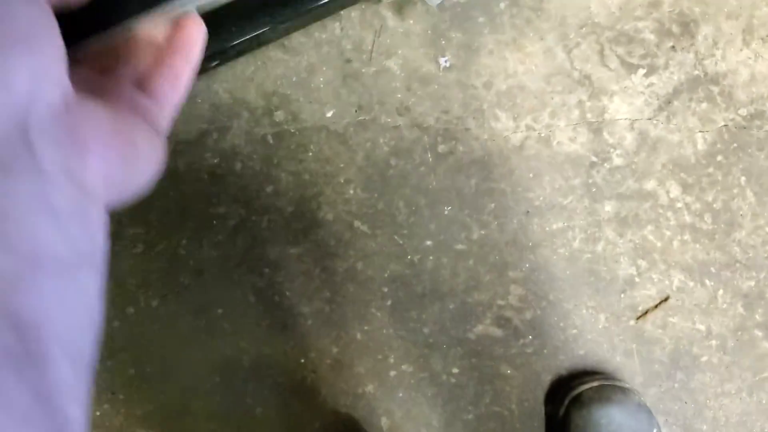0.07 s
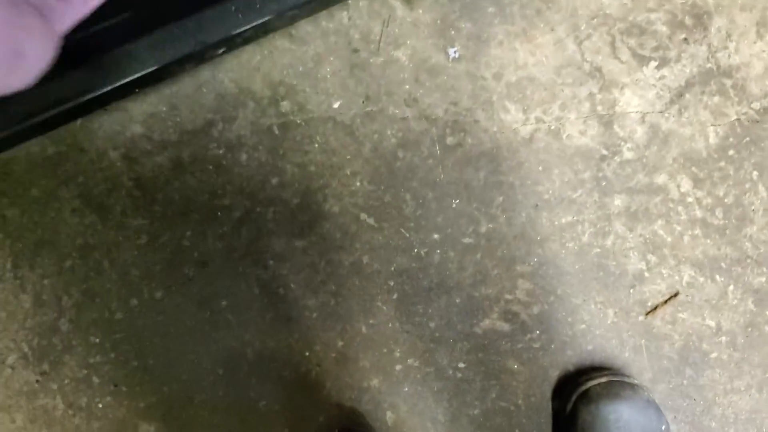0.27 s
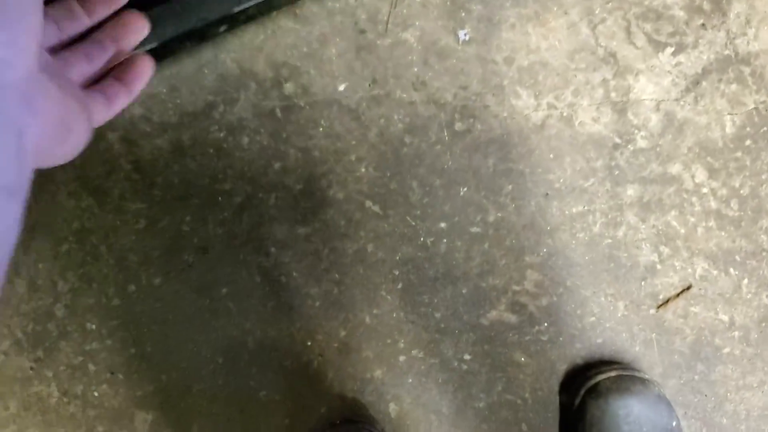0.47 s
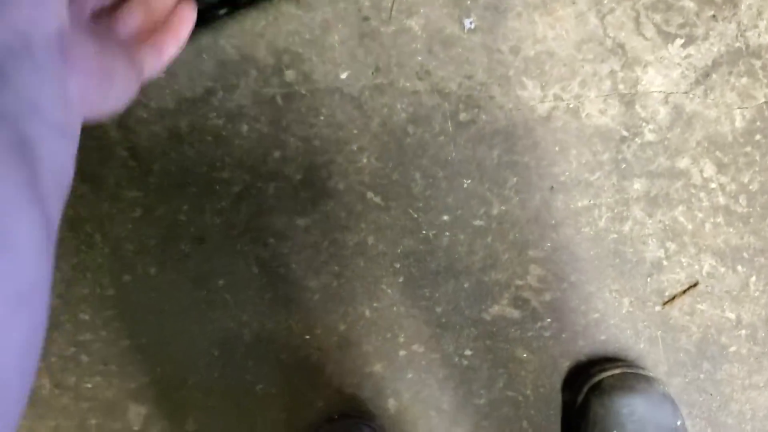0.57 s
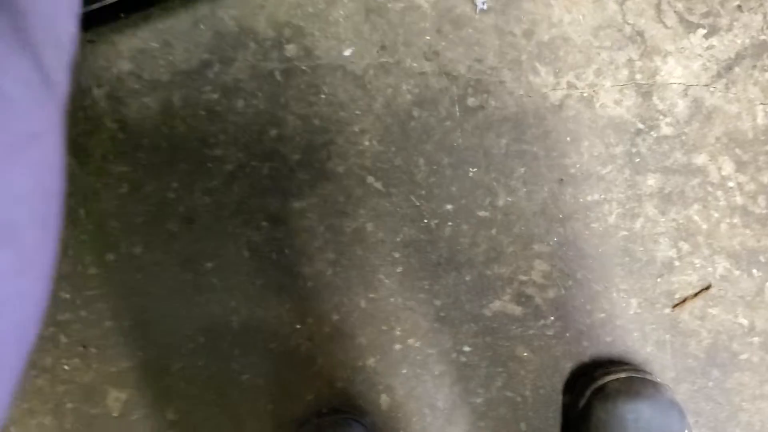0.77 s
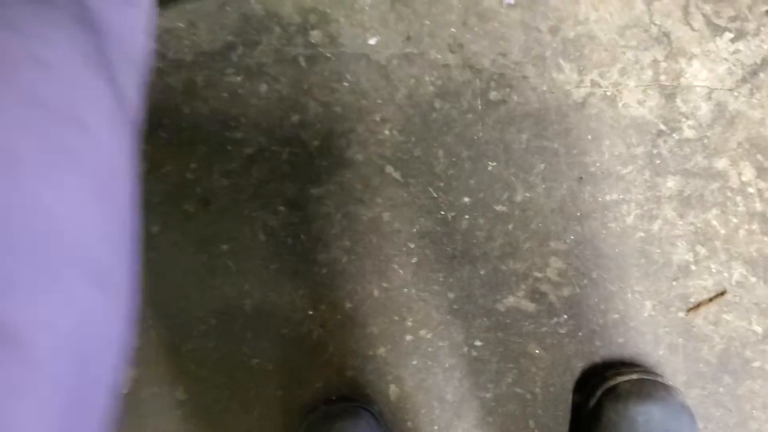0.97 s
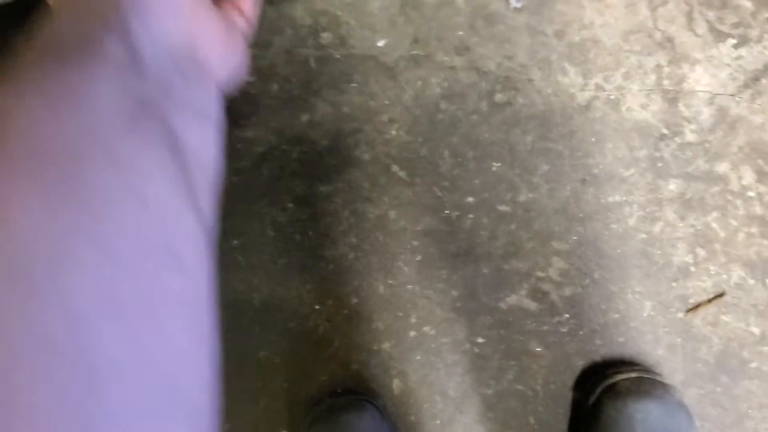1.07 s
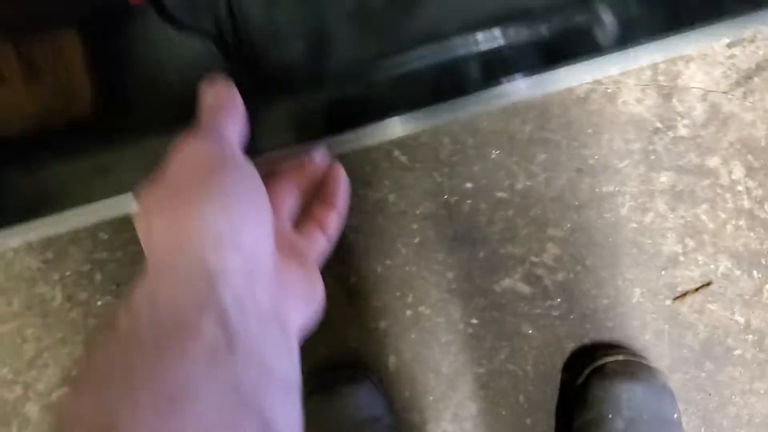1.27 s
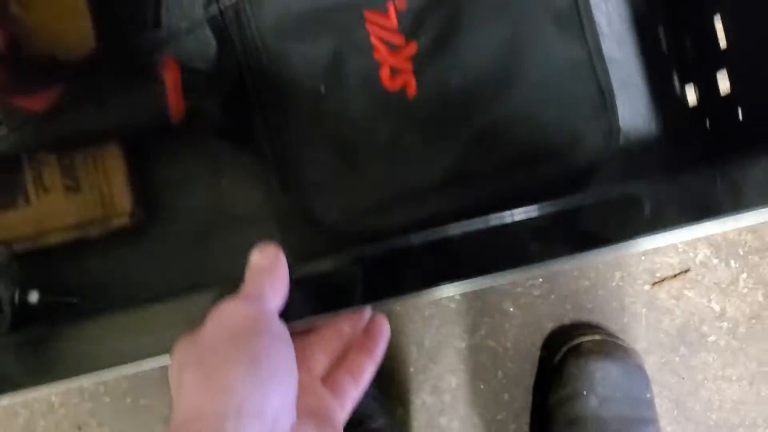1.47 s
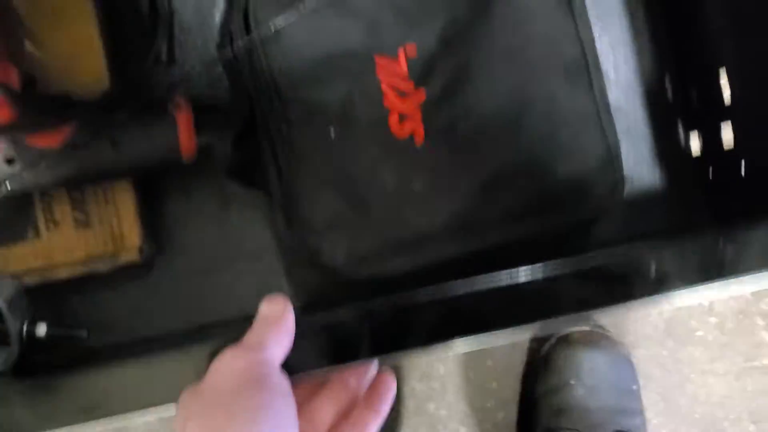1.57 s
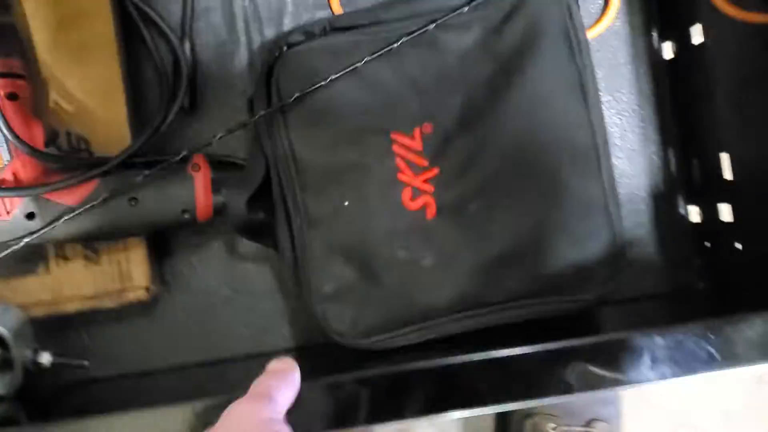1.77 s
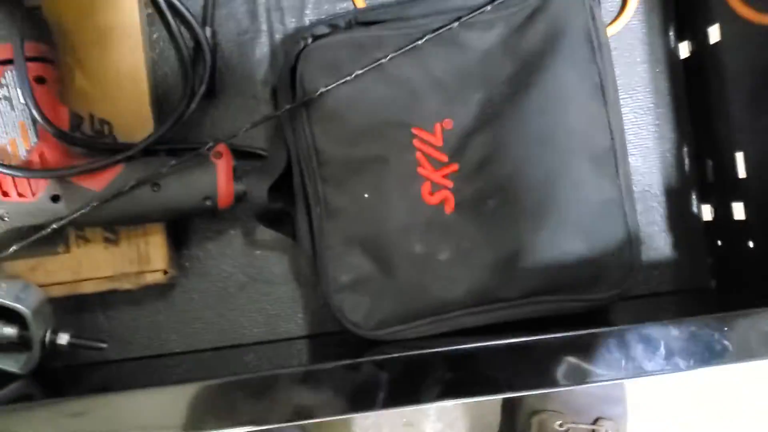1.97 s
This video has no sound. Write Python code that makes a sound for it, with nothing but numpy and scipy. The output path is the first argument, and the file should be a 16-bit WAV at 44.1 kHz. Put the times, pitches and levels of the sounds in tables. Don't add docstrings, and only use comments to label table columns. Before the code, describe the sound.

A heavy steel tool drawer clicks and bangs shut with a deep boom, then after light handling a second drawer rolls open, clacks midway and slams to its stop, heard close in a reverberant garage.

```python
import sys
import numpy as np
from scipy import signal
from scipy.fft import rfft, irfft, next_fast_len
from scipy.io import wavfile
from scipy.ndimage import uniform_filter1d

SR = 44100
rng = np.random.default_rng(int(sys.argv[2]) if len(sys.argv) > 2 else 0)


def int16_out(signal):
    q = np.round(np.clip(np.atleast_2d(signal).T, -1, 1) * 32767)
    wavfile.write(sys.argv[1], SR, q.astype(np.int16))


def elevation(decibels):
    levels = np.asarray(decibels, float)
    return 10 ** (levels / 20)


N = 89214

APART_HZ = 1000


def rms_one(x):
    return x / np.sqrt(np.mean(x ** 2) + 1e-20)


def in_time(rows):
    s, db = np.transpose(rows)
    return np.interp(np.arange(N) / SR, s, db, left=-120)


def shaped(x, gain_db):
    size = next_fast_len(2 * x.shape[-1])
    size += size % 2
    hz = np.maximum(np.arange(size // 2 + 1) * SR / size, 10)
    cepstrum = irfft(gain_db(hz) * np.log(10) / 20, size)
    cepstrum[1:size // 2] *= 2
    cepstrum[size // 2 + 1:] = 0
    response = np.exp(rfft(cepstrum))
    return irfft(rfft(x, size) * response, size)[..., :x.shape[-1]]


def colour(points):
    hz, db = np.transpose(points)
    return lambda f: np.interp(np.log(f), np.log(hz), db)


def pair(mid, side):
    side = signal.lfilter(*signal.butter(1, APART_HZ, "high", fs=SR), side)
    return np.array([mid + side, mid - side]) / np.sqrt(2)


def clicks(per_s, spread, size):
    sizes = elevation(spread * np.minimum(rng.exponential(1, size), 5))
    sizes = sizes * (rng.random(size) < per_s / SR)
    return rms_one(sizes * rng.choice([-1, 1], (2, size)))


def wander(per_s):
    steps = rng.standard_normal(400)
    return np.interp(np.arange(N) / SR * per_s, np.arange(len(steps)), steps)


def body(modes):
    t, out = np.arange(SR // 5) / SR, 0
    for hz, db, t60 in modes:
        t60 = min(t60, .03 + 90 / hz / 2)
        for partner in (.992, 1.011):
            phase = rng.normal(0, 1, (2, 1)) * min(hz / APART_HZ / 2, 1.5) * [[1], [-1]] / 2
            decay = elevation(-15.5 + db - 20 - 60 * t / t60)
            out = out + decay * np.sin(2 * np.pi * hz * partner * t + phase)
    return out


def strikes(hits, modes):
    rise_s, blow_db = 0.00067, 15.5
    sheet_t60_s = 0.0038
    sheet, drive = np.zeros((2, N + SR)), np.zeros((2, N + SR))
    t = np.arange(SR // 6) / SR
    for s, db, decay, tilt, pan in hits:
        chatter = clicks(per_s=9000, spread=1.83, size=len(t))
        burst = chatter * (1 - np.exp(-t / rise_s)) * elevation(db - 60 * t / decay)
        burst[:, int(2 * rise_s * SR)] += elevation(db + blow_db)
        burst = shaped(burst, lambda f: tilt * np.log2(np.clip(f, 450, 14000) / 3000))
        smear = rng.standard_normal((2, 600)) * elevation(-60 * t[:600] / sheet_t60_s)
        smear = smear / np.sqrt(np.sum(smear ** 2) / 2)
        shake = pair(*signal.fftconvolve(burst, smear, axes=1)[:, :len(t)])
        start = int(s * SR)
        at, side = slice(start, start + len(t)), elevation([[pan / 2], [-pan / 2]])
        sheet[:, at] += shake * side
        drive[:, at] += burst[0] * side
    ringing = signal.fftconvolve(drive[:, :N], body(modes), axes=1)[:, :N]
    return np.array([sheet[:, :N], ringing])


def slam():
    # start_s [s], level_db [dB], decay_s [s], tilt_db [dB/octave], left_right_db [dB]
    slam_hits = [(1.8, -32, .02, 2.5, 3), (1.802, -8, 0.065, -1, -2.5), (1.8095, -14.5, 0.08, -1.5, -9),
                 (1.8145, -10.5, 0.063, -0.4, -2), (1.822, -12.5, 0.068, -1, 2),
                 (1.830, -18, .08, -4, -3.5), (1.845, -20.5, 0.11, -3.5, 0.5), (1.860, -23, 0.09, 0, -7),
                 (1.872, -21.5, 0.12, 1.5, -9), (1.885, -20, 0.14, -1, 0.5), (1.91, -25.5, 0.088, -0.5, -9),
                 (1.925, -29, 0.14, -3, -2), (1.951, -30, 0.086, -4.5, 0), (1.978, -33, 0.06, 4.5, -7.5),
                 (1.997, -41.5, 0.02, 12.5, -18)]
    # pitch_hz [Hz], level_db [dB], t60_s [s]
    slam_modes = [(544, -20, 0.1), (918, -2, 0.056), (1155, -8, .04), (1380, 0, 0.056), (1489, 1, 0.03),
                  (2090, -1.5, 0.022), (2220, 0, 0.045), (3020, -3, 0.054), (3260, -1, 0.028),
                  (4160, -21, 0.031), (6040, -6, .03), (6800, -4.5, .04), (7230, -3, 0.044)]
    return strikes(slam_hits, slam_modes)


def shut():
    # start_s [s], level_db [dB], decay_s [s], tilt_db [dB/octave], left_right_db [dB]
    shut_hits = [
        (.3535, -8, 0.081, 1.2, -4),
        (.3585, -23.5, 0.041, -3.5, 3),
        (.362, -7, 0.076, 1, -4),
        (.369, -10.5, 0.11, -2, 4.5),
        (.381, -17, 0.14, 1, -8.5),
        (.395, -21, 0.14, -2.5, -5),
        (.413, -22, 0.16, -0.5, 3),
        (.428, -27, 0.18, -2.5, 0),
        (.452, -42, 0.3, -6, 0),
    ]
    # pitch_hz [Hz], level_db [dB], t60_s [s]
    shut_modes = [(373, -13.5, 0.23), (389, -4.5, .18), (456, -12, .15), (586, -10.5, 0.12), (693, -11, .1),
                  (870, -10, 0.04), (1105, -9.5, 0.037), (1550, -13.5, .07), (1785, -6, .07),
                  (2246, -2.5, 0.033), (2382, -7, .04), (3400, -14, 0.025), (4270, -7.5, 0.026),
                  (6460, -10, .03)]
    return strikes(shut_hits, shut_modes)


def latch():
    # start_s [s], level_db [dB], decay_s [s], tilt_db [dB/octave], left_right_db [dB]
    latch_hits = [
        (.2515, -23, 0.026, 0.56, 0),
        (.2535, -15.5, 0.029, 1, -1.7),
        (.2555, -14, 0.071, 1, -2.4),
        (.265, -22.5, 0.087, 0.4, -1.3),
    ]
    # pitch_hz [Hz], level_db [dB], t60_s [s]
    latch_modes = [(1000, -12, .06), (1367, -8, .08), (1920, -15, 0.04), (2280, -4, 0.047), (2600, -5, .05),
                   (2890, -2.5, .05), (3540, 2, .06), (3700, -4, .06), (4280, 6, 0.044)]
    return strikes(latch_hits, latch_modes)


def detent():
    # start_s [s], level_db [dB], decay_s [s], tilt_db [dB/octave], left_right_db [dB]
    detent_hits = [
        (.3105, -22.5, 0.09, -2.5, -2),
        (.322, -14.5, 0.071, 1, 2),
        (.327, -17, 0.079, 1, -4.5),
        (.340, -26.5, 0.09, 2, 4),
    ]
    # pitch_hz [Hz], level_db [dB], t60_s [s]
    detent_modes = [(373, -10.5, 0.11), (720, -1, 0.13), (1024, -8, .05), (1310, -11, 0.055),
                    (2360, -2, .05), (3485, 2.5, .045), (4380, -11, .03)]
    return strikes(detent_hits, detent_modes)


def middle_stop():
    # start_s [s], level_db [dB], decay_s [s], tilt_db [dB/octave], left_right_db [dB]
    open_hits = [
        (1.285, -35.5, 0.1, -4.5, -2),
        (1.305, -38, 0.061, -2.5, -3),
        (1.318, -36, 0.1, -2, -3),
        (1.329, -32.5, 0.066, -2.5, -5.5),
        (1.345, -41.5, 0.089, -5.5, 2),
        (1.362, -37, 0.11, -5, -2),
        (1.3935, -22, 0.04, 4.5, -2),
        (1.397, -22, 0.091, 3.5, -5.5),
        (1.406, -26.5, 0.054, -4.5, 4),
        (1.44, -38, 0.076, -1, -5),
    ]
    # pitch_hz [Hz], level_db [dB], t60_s [s]
    open_modes = [(247, -17, 0.18), (541, -5.5, 0.096), (662, -3.5, 0.054), (1420, -8, 0.069),
                  (1830, -10, .06), (2190, -7, .04), (2880, 1, 0.021), (3570, -7, .04), (4200, -5, .05),
                  (6790, -4.5, .05)]
    return strikes(open_hits, open_modes)


def grip():
    # start_s [s], level_db [dB], decay_s [s], tilt_db [dB/octave], left_right_db [dB]
    grip_hits = [(.082, -55, 0.022, 6.5, -15), (.752, -48.5, 0.05, 2.7, -15), (.815, -44.5, 0.1, 1, 3),
                 (.8235, -30, 0.086, 2.3, -3.5), (.837, -30.5, 0.082, 1.2, -9),
                 (.845, -32.5, 0.067, 1.3, 2.5), (.861, -44.5, .2, 0.42, -3), (.912, -49, 0.027, 3.6, -7),
                 (.988, -58, 0.024, 1.8, -15), (1.185, -58, 0.043, 6.2, -11), (1.68, -55, 0.024, 3.1, -21),
                 (1.692, -55, 0.03, 3.7, -17)]
    # pitch_hz [Hz], level_db [dB], t60_s [s]
    grip_modes = [(955, -1, 0.074), (2070, -3, 0.051), (2490, 2, 0.04), (3200, 11.5, 0.022),
                  (3660, 6.5, 0.023)]
    return strikes(grip_hits, grip_modes)


def thumps():
    # start_s [s], pitch_hz [Hz], level_db [dB], t60_s [s], rise_s [s]
    pushes = [(0.261, 120, -22, 0.11, 0.0064), (0.317, 97, -20, 0.17, 0.0081),
              (0.359, 49.7, -12, 0.18, .01), (0.3543, 80.7, -7, 1.5, 0.011),
              (0.378, 256.4, -18, 0.26, 0.0074), (0.384, 104.6, -5.5, 0.15, 0.0077),
              (.420, 151.3, -28.5, 1.1, 0.01), (0.7525, 89, -25.5, 0.26, 0.0035),
              (0.816, 82, -28, 0.4, .012), (1.335, 104.5, -26, 0.25, 0.018),
              (1.403, 285, -20.5, 0.08, 0.0018), (1.416, 100.2, -15, 0.18, 0.005),
              (1.807, 66.3, -10, 0.25, 0.012), (1.826, 241, -14, 0.22, 0.0058),
              (1.833, 315, -6, 0.037, 0.0023), (1.837, 41.67, -17, 0.23, .01),
              (1.855, 181, -18, 0.13, 0.0034), (1.874, 106.9, -9, 0.29, 0.014),
              (1.900, 199.5, -18.5, 0.47, 0.0033), (1.93, 49.5, -18, 0.36, .03),
              (1.981, 106.3, -18, 0.26, 0.011)]
    # start_s [s], pitch_hz [Hz], level_db [dB], t60_s [s]
    small_tool = (1.83, 14920, -42, .6)
    grip_s, grip_damp_db_per_s = 0.765, 210
    out, now = np.zeros(N), np.arange(N) / SR
    for s, hz, db, t60, rise in pushes:
        t = np.maximum(now - s, 0)
        damp_db = grip_damp_db_per_s * np.maximum(now - grip_s, 0) * (s < grip_s)
        level = elevation(db - 60 * t / t60 - damp_db + 1.3 * wander(30.1))
        out += level * (1 - np.exp(-t / rise)) * np.sin(2 * np.pi * hz * t)
    shake = rms_one(signal.lfilter(*signal.butter(2, 120, fs=SR), rng.standard_normal(N)))
    loudness = np.sqrt(np.abs(uniform_filter1d(out ** 2, size=1000)))
    out = out + elevation(-16) * shake * loudness
    s, hz, db, t60 = small_tool
    t = np.maximum(now - s, 0)
    ping = elevation(db - 60 * t / t60 + 5.0 * wander(150.0)) * np.sin(2 * np.pi * hz * t)
    return out * elevation([[.6], [-.6]]) + ping * elevation([[-3.0], [3.0]])


def grains(curve, spectrum, lift_db, lumpy_db, pan_db):
    ticks = clicks(per_s=4000, spread=2.0, size=N)
    ticks = rms_one(shaped(pair(*ticks), colour(spectrum)))
    level = elevation(in_time(curve) + lift_db + lumpy_db * wander(70.0))
    return ticks * level * elevation([[pan_db / 2], [-pan_db / 2]])


def rolling():
    # start_s [s], level_db [dB]
    roll_curve = [(0, -44), (.12, -42), (.25, -44.5), (.4, -26), (.6, -50.5), (.76, -46.5), (.95, -53.5),
                  (1.08, -51), (1.16, -44), (1.26, -41.5), (1.29, -38.5), (1.365, -36.5), (1.385, -40),
                  (1.42, -31), (1.47, -39), (1.6, -51.5), (1.8, -44), (2.02, -30.5)]
    # pitch_hz [Hz], level_db [dB per Hz]
    roll_spectrum = [(24, -51), (40, -0.5), (112, 10), (147, 1.5), (392, 0.5), (4130, -23.5), (5440, -32.5),
                     (7000, -31), (16000, -101)]
    return grains(roll_curve, roll_spectrum, lift_db=2.5, lumpy_db=2.3, pan_db=.3)


def rattle():
    # start_s [s], level_db [dB]
    rattle_curve = [(1.803, -16), (1.811, -38), (1.825, -17.5), (1.835, -31.5), (1.943, -41),
                    (2.003, -38.5), (2.02, -41.5)]
    # pitch_hz [Hz], level_db [dB per Hz]
    rattle_spectrum = [(290, -10), (500, -24), (807, -38), (1020, -4), (5310, -17), (7000, -10.5),
                       (9630, -30), (12700, -16), (16000, -14)]
    return grains(rattle_curve, rattle_spectrum, lift_db=4, lumpy_db=0.5, pan_db=-7.5)


def garage(x):
    t = np.arange(SR) / SR
    near = elevation(-6 - 60 * t / 0.29) / np.sqrt(0.29)
    far = elevation(-11 - 60 * t / 0.97)
    tail = pair(*rng.standard_normal((2, SR))) * (t > .004)
    tail = tail * (near + far)
    tail = signal.sosfilt(signal.butter(2, 180, "high", fs=SR, output="sos"), tail)
    tail = tail * np.sqrt(np.log(1e6) / SR)
    tail = signal.lfilter(*signal.butter(1, 2750, fs=SR), tail)
    return signal.fftconvolve(x, tail, axes=1)[:, :N]


def air():
    # pitch_hz [Hz], level_db [dB per Hz]
    air_spectrum = [(15, -42), (25, -2.5), (145, -4.5), (200, 1.5), (249, 0), (301, -10), (427, -14.5),
                    (677, -14.5), (16000, -44)]
    noise = rms_one(shaped(pair(*rng.standard_normal((2, N))), colour(air_spectrum)))
    return elevation(-45 + 0.5 * wander(11.2)) * noise


def scene():
    # pitch_hz [Hz], level_db [dB per Hz]
    sheet_response = [(90, -15.5), (200, -0.5), (420, 4), (730, -2.5), (3000, 1), (6500, -5), (9600, -9.5),
                      (16000, -9.5)]
    steel = colour(sheet_response)
    sheet, ringing = latch() + detent() + shut() + grip() + middle_stop() + slam()
    sheet = shaped(sheet, lambda f: steel(f) - steel(4650.0))
    reverberation = garage(sheet + ringing / 2)
    return sheet + ringing + reverberation + thumps() + rolling() + rattle() + air()


def top_cut(x):
    return signal.sosfilt(signal.butter(12, 16660, fs=SR, output="sos"), x)


def record(dry):
    # pitch_hz [Hz], width_hz [Hz], level_db [dB]
    port_peaks = [(6790, 870, 7), (12450, 1130, 6.5), (8030, 1840, -4)]
    x = shaped(dry, lambda f: sum(db * np.exp(-((f - hz) / width) ** 2) for hz, width, db in port_peaks))
    x = np.tanh(x / 1.05) * 1.05
    x = signal.sosfilt(signal.cheby2(12, 60, 16400, fs=SR, output="sos"), x)
    x = signal.sosfilt(signal.butter(4, 26, "high", fs=SR, output="sos"), x)
    treble = signal.lfilter(*signal.butter(2, 9000, "high", fs=SR), x)
    x = x + elevation(-22) * treble * [[-1], [1]]
    return top_cut(x)


dry = scene()
out = record(dry)
int16_out(out)
```